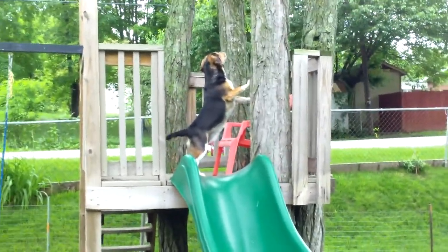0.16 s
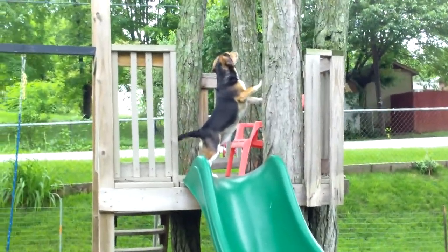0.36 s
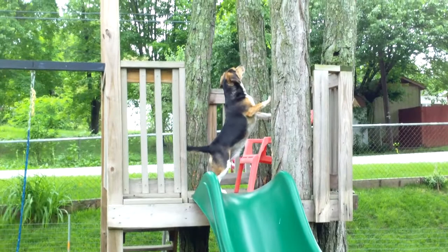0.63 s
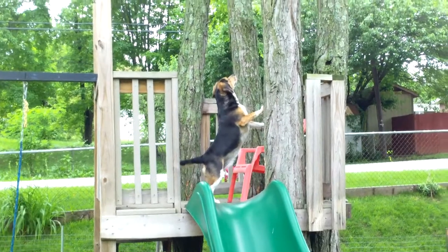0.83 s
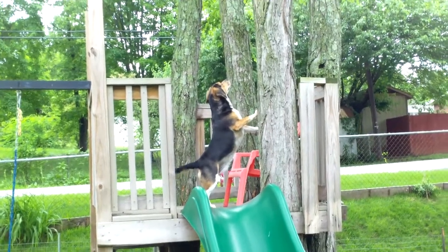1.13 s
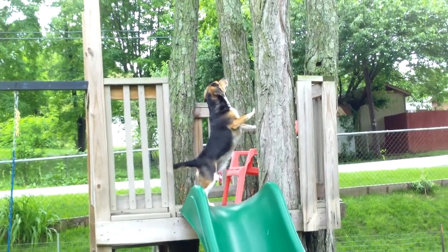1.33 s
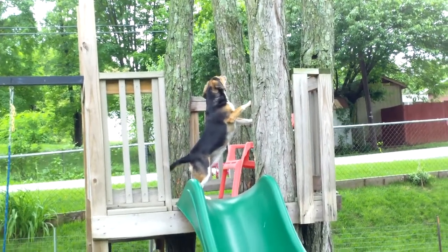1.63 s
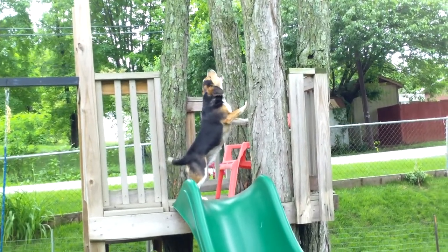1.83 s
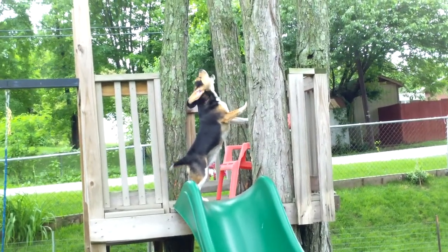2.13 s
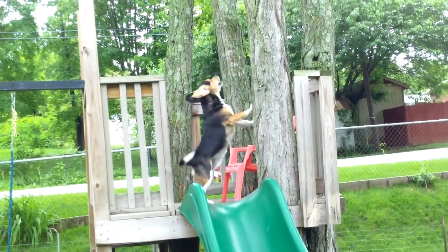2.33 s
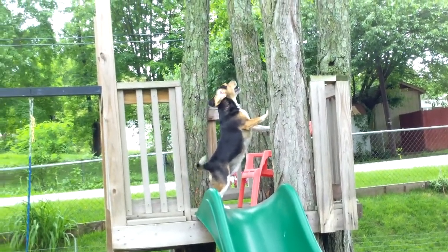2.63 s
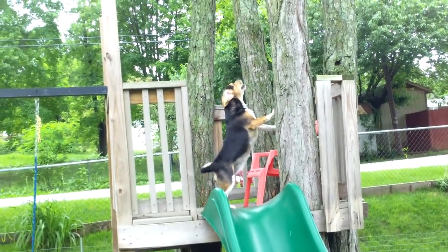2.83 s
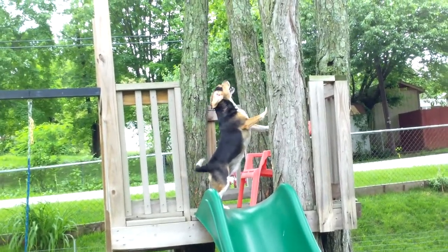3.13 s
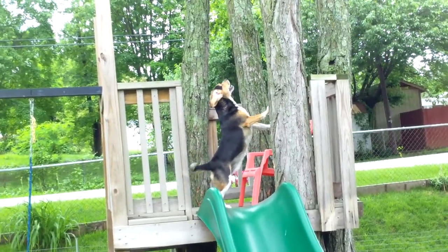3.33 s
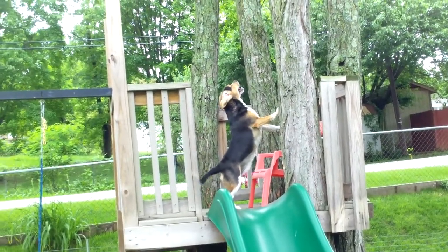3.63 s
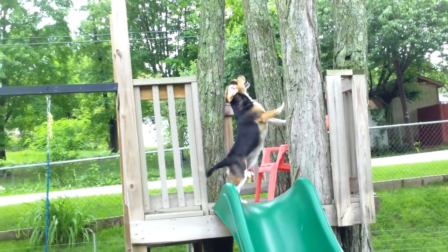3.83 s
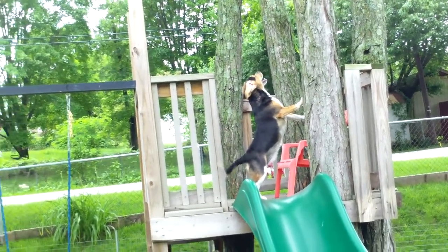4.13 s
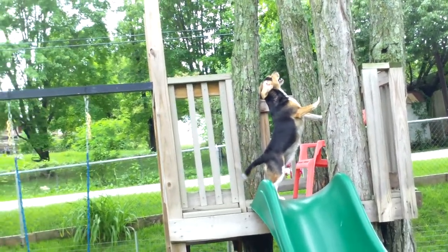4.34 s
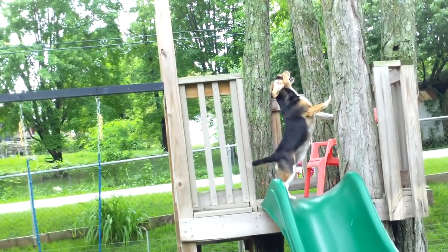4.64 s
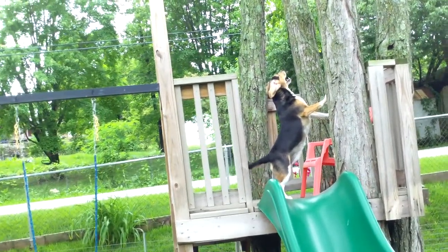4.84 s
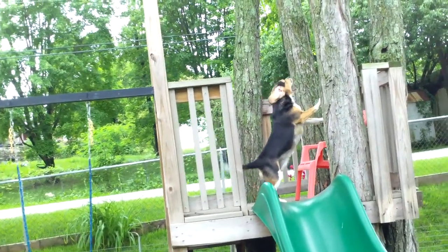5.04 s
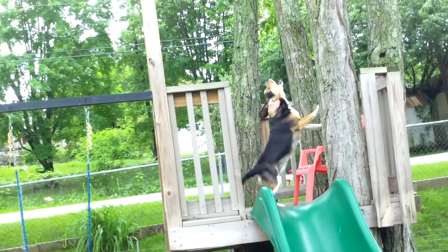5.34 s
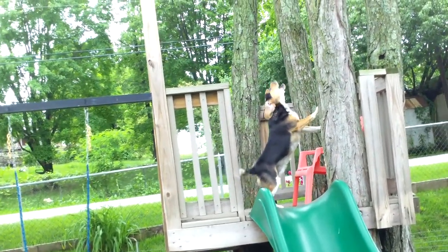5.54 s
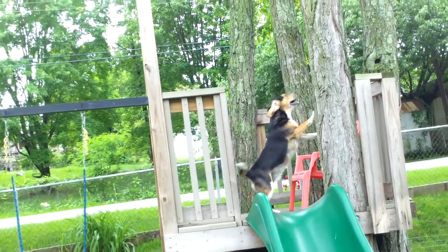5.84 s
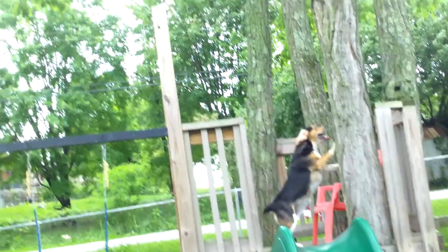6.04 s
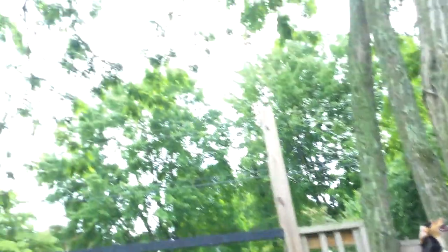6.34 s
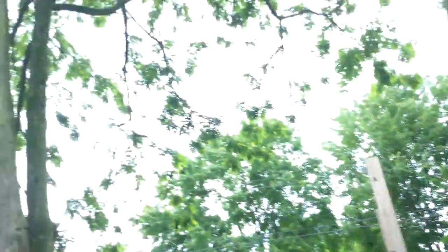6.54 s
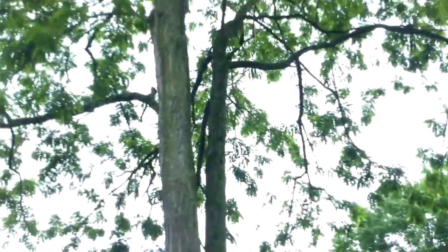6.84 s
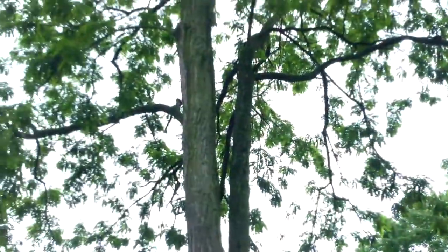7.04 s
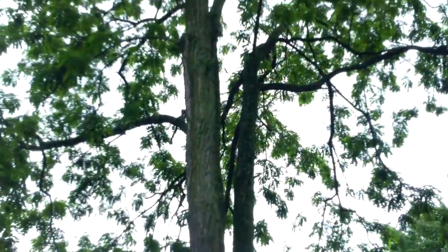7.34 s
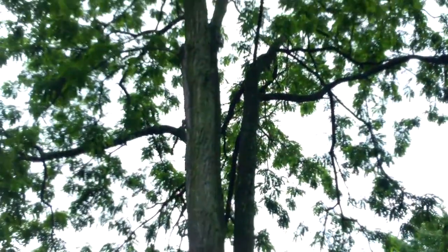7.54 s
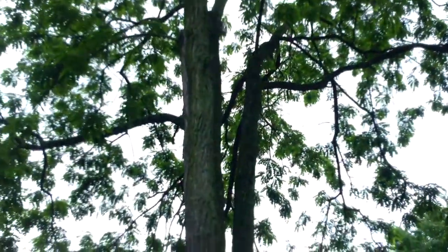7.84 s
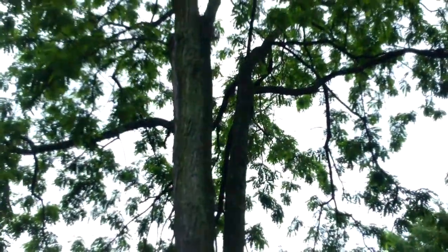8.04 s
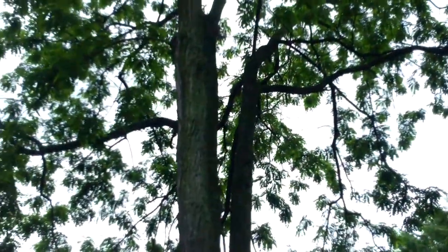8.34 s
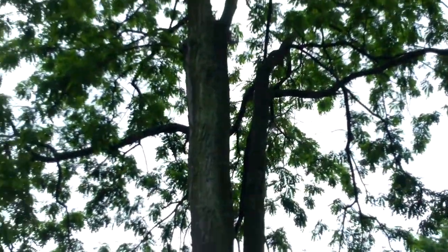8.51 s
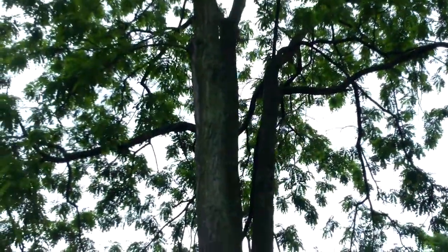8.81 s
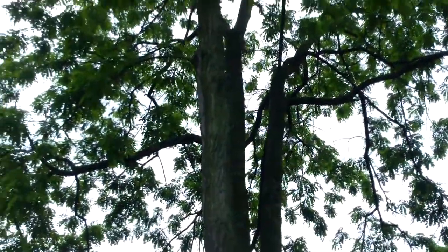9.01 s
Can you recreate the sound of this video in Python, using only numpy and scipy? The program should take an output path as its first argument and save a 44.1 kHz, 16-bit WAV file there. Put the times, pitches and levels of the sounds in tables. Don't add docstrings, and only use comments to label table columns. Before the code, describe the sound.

Outdoors, a dog bays loudly three times with a clipped bark between, echoing off houses over soft breeze and scattered birdsong.

```python
import sys
import numpy as np
from scipy import signal
from scipy.fft import rfft, irfft, next_fast_len
from scipy.io import wavfile
from scipy.ndimage import uniform_filter1d, minimum_filter1d

SR = 44100
rng = np.random.default_rng(int(sys.argv[2]) if len(sys.argv) > 2 else 0)


def put_to_file(sound):
    columns = np.atleast_2d(sound).T
    safe = np.clip(columns, -1, 1)
    whole_steps = np.round(safe * 32767)
    wavfile.write(sys.argv[1], SR, whole_steps.astype(np.int16))


def volts_from_decibels(level):
    exponent = np.asarray(level, float) / 20
    return 10 ** exponent


N = 404397
T = np.arange(N) / SR


def rms_one(x):
    return x / np.sqrt(np.mean(x ** 2) + 1e-20)


def evened(x, span_s):
    return x / np.sqrt(uniform_filter1d(x ** 2, int(span_s * SR)) + 1e-12)


def drift(rate_hz):
    r = np.exp(-2 * np.pi * rate_hz / SR)
    noise = rng.standard_normal(N + SR)
    return rms_one(signal.lfilter([1], [1, -2 * r, r * r], noise)[SR:])


def filtered(x, order, edges_hz, kind):
    return signal.sosfilt(signal.butter(order, edges_hz, kind, fs=SR, output="sos"), x)


def shaped(x, gain_at):
    size = next_fast_len(len(x))
    hz = np.arange(size // 2 + 1) * SR / size
    return irfft(rfft(x, size) * gain_at(hz), size)[:len(x)]


def resonance_gain(modes, hz):
    return np.sqrt(sum(volts_from_decibels(2 * db) / (1 + (2 * (hz - f) / w) ** 2) ** 2 for f, w, db in modes))


def played(notes, edge_s):
    s, *columns = np.transpose(np.concatenate(notes))
    gate = sum(np.clip(np.minimum(T - n[0][0], n[-1][0] - T) / edge_s + .5, 0, 1) for n in notes)
    curves = [uniform_filter1d(np.interp(T, s, c), size=300) for c in columns]
    return curves, np.minimum(gate, 1)


# pitch_hz, density_db_per_hz
YARD_SPECTRUM = [(12, -25.5), (20, 5.5), (126, -8), (246, -14), (373, -15.5), (493, -18.5), (616, -18.5),
                 (885, -21), (1080, -20.5), (1930, -23.5), (3280, -24), (6960, -34.5), (8690, -31),
                 (15600, -38)]
# time_s, level_db
BREEZE = [(0, -50.5), (1.5, -50), (3.0, -47), (4.5, -47), (6.0, -46), (7.0, -47), (8.1, -44.5), (8.5, -43),
          (8.85, -47), (9.17, -38)]


def yard_noise():
    points_hz, points_db = np.transpose(YARD_SPECTRUM)
    hum = shaped(rng.standard_normal(N),
                 lambda hz: volts_from_decibels(np.interp(np.log(hz + 1), np.log(points_hz), points_db)))
    breeze_db = np.interp(T, *np.transpose(BREEZE)) + .6 * drift(2)
    insect_modes = [(8580, 220, 0)]   # pitch_hz, width_hz, level_db
    insect = shaped(rng.standard_normal(N), lambda hz: resonance_gain(insect_modes, hz))
    air = rms_one(hum) * volts_from_decibels(breeze_db) + volts_from_decibels(-67 + 1.2 * drift(2)) * rms_one(insect)
    gust_s, leaves_hz, lull_share = .41, 5000, .4
    treble = shaped(air, lambda hz: 1 / (1 + (leaves_hz / (hz + 1)) ** 8))
    return air - lull_share * (T < gust_s) * treble


# start_s, length_s, first_hz, held_hz, level_db
SONG = [(0, 0.053, 2520, 2480, -70), (0.809, 0.059, 8200, 6630, -63.5), (0.848, 0.084, 6800, 7400, -62),
        (0.853, 0.36, 3200, 3420, -79), (4.264, 0.087, 3580, 2580, -63.5),
        (4.345, 0.065, 3120, 2685, -55.5), (4.436, 0.1, 2640, 2345, -62), (4.734, 0.052, 3210, 2790, -55),
        (4.915, 0.12, 2580, 2470, -60), (5.803, 0.13, 2470, 2350, -63), (6.017, 0.12, 2900, 2530, -49),
        (6.17, 0.065, 3220, 2250, -56), (6.381, 0.088, 2487, 2544, -58), (7.157, 0.2, 2760, 2503, -56),
        (7.956, 0.22, 5880, 5880, -66), (8.427, 0.11, 3440, 3330, -65.5), (8.5, 0.075, 2420, 2525, -66),
        (8.585, 0.04, 2300, 2860, -65), (8.992, 0.17, 2750, 2990, -63),
        (4.243, 0.023, 3250, 3900, -61.5), (4.325, .03, 2550, 3150, -56), (4.72, .04, 3250, 4000, -65),
          (5.945, .035, 2300, 2350, -57.5), (8.05, 0.081, 6400, 5620, -69), (8.1, 0.035, 2600, 2450, -62),
          (4.26, 0.095, 3200, 3620, -72), (4.77, 0.15, 2750, 2230, -59), (4.43, 0.051, 2600, 2400, -58.5),
          (7.02, 0.07, 3450, 3300, -69), (6, 0.028, 3200, 3500, -60)]


def song(flutter_db):
    slide_s, fade_db = .05, -3
    out = np.zeros(N + SR)
    for start_s, length_s, first_hz, held_hz, level_db in SONG:
        part = np.linspace(0, 1, int(length_s * SR))
        left = np.clip(1 - part * length_s / slide_s, 0, 1) ** 2
        pitch_hz = held_hz + (first_hz - held_hz) * left
        shape = volts_from_decibels(level_db + fade_db * (part - 2)) * np.sqrt(2 * np.sin(np.pi * part).clip(0))
        out[int(start_s * SR):][:len(part)] += shape * np.sin(2 * np.pi * np.cumsum(pitch_hz) / SR)
    return out[:N] * volts_from_decibels(flutter_db * drift(50))


# start_s, length_s, first_hz, last_hz, level_db
CHIPS = [(3.09, .022, 4900, 6000, -50), (.1, .13, 1100, 1240, -61), (5.8, .08, 2700, 3300, -62),
         (1.86, .075, 3230, 3170, -34), (0, 0.017, 7360, 7100, -60.5), (0.093, 0.059, 3930, 3560, -61),
         (0.266, 0.059, 2830, 3100, -62.5), (0.41, 0.034, 4970, 5120, -55.5),
         (0.492, 0.029, 7130, 7250, -64), (0.758, 0.037, 3275, 3250, -58), (1.094, 0.018, 4300, 6330, -45),
         (1.447, 0.02, 4200, 6230, -44.5), (1.082, 0.016, 6400, 4890, -52.5),
         (1.44, 0.012, 6200, 4500, -51), (1.107, .02, 5900, 5200, -55), (1.465, .03, 6000, 5940, -58),
         (1.468, 0.013, 5820, 5450, -52.5), (8.907, 0.022, 3530, 3800, -51), (5.72, 0.065, 2650, 3250, -53),
         (1.548, 0.025, 4140, 4524, -60), (1.572, .018, 4650, 4825, -57.5), (1.6, 0.016, 960, 880, -50.5),
         (2.671, .009, 5960, 5000, -55), (2.677, 0.02, 4400, 5870, -51), (2.697, 0.0098, 5800, 5100, -54),
         (2.71, .018, 5800, 5100, -58), (2.984, 0.095, 3700, 3750, -60.5),
         (4.729, 0.031, 5400, 4280, -54.5), (7.072, 0.036, 2250, 2350, -49.5),
         (7.185, 0.031, 4260, 4000, -43.5), (7.067, 0.13, 3450, 2840, -52), (9.044, .075, 3040, 1840, -52)]


def chips():
    out = np.zeros(N + SR)
    for start_s, length_s, first_hz, last_hz, level_db in CHIPS:
        n = int(length_s * SR)
        phase = 2 * np.pi * np.cumsum(np.linspace(first_hz, last_hz, n)) / SR
        out[int(start_s * SR):][:n] += volts_from_decibels(level_db) * 2 * np.hanning(n) * np.sin(phase)
    return out[:N] * volts_from_decibels(2.5 * np.tanh(drift(150)))


def grit_bursts(table, octaves):
    lead_s = .3
    out, t = np.zeros(N + 2 * SR), np.arange(SR) / SR - lead_s
    for peak_s, rise_s, fall_s, level_db, centre_hz in table:
        grit = rng.standard_normal(SR) * volts_from_decibels(rng.exponential(1, SR))
        edges_hz = np.clip(centre_hz * 2 ** (np.array([-.5, .5]) * octaves), 30, .45 * SR)
        shape = np.where(t < 0, np.exp(-(t / rise_s) ** 2), np.exp(-t / fall_s))
        out[int(peak_s * SR):][:SR] += volts_from_decibels(level_db) * shape * rms_one(filtered(grit, 3, edges_hz, "band"))
    return out[int(lead_s * SR):][:N]


# peak_s, rise_s, fall_s, level_db, centre_hz
WHINE = [(.02, .03, .05, -60, 1050), (.05, .04, .04, -66, 1520), (.16, .035, 0.042, -57, 1210),
         (.25, .03, .04, -66, 1280), (.32, .03, .06, -58, 1360), (.43, .03, .04, -59, 1410),
         (.52, 0.033, .05, -61, 1380)]


def whine():
    return grit_bursts(WHINE, octaves=.13)


# peak_s, rise_s, fall_s, level_db, centre_hz
RUSTLES = [(.3, 0.35, 0.07, -62, 3620), (3.564, .0055, 0.019, -45.5, 4500),
           (3.62, 0.032, 0.054, -37.5, 3270), (3.62, 0.044, 0.068, -46.5, 5330),
           (3.634, 0.039, 0.051, -47.5, 9620), (3.8, .03, 0.11, -52, 8640),
           (8.909, .0016, 0.01, -33.5, 4960), (9.11, 0.044, .06, -46, 5000),
           (3.09, 0.0038, 0.013, -46, 5200), (3.41, 0.016, 0.11, -53, 4400), (4.36, .06, 0.036, -50, 2900),
           (4.9, 0.13, 0.18, -55, 3410), (6.74, 0.11, 0.063, -55, 3650)]


def rustles():
    return grit_bursts(RUSTLES, octaves=.55)


# peak_s, rise_s, fall_s, level_db, centre_hz
RASPS = [(3.627, .004, .04, -44, 5600), (3.63, .02, .04, -43.5, 7800), (3.713, .002, 0.05, -43.5, 8000),
         (3.766, .002, 0.055, -41, 9000), (3.884, 0.002, 0.055, -47, 8100), (.411, .002, .012, -55, 5000),
         (6.085, .025, .015, -47, 1650), (5.4, .03, .03, -51, 3950), (8.25, .04, .04, -58, 3850),
         (8.37, .03, .04, -56, 2350)]


def rasps():
    return grit_bursts(RASPS, octaves=.24)


# peak_s, rise_s, fall_s, level_db, centre_hz
CLAWS = [(.681, 0.031, 0.17, -52.5, 3800), (1.257, 0.0008, 0.0017, -38, 3500),
         (1.267, 0.0011, .003, -41.5, 3010), (6.08, 0.025, 0.017, -43.5, 4770),
         (6.352, 0.047, 0.033, -49.5, 3500), (6.656, 0.018, 0.0099, -53.5, 4000),
         (7.239, 0.019, 0.028, -46.5, 2345)]


def claws():
    return grit_bursts(CLAWS, octaves=1.52)


# peak_s, rise_s, fall_s,
# level_db, centre_hz
KNOCKS = [(7.414, 0.017, 0.019, -11, 668), (5.29, 0.017, .008, -9, 850), (7.965, .02, .02, -39, 1060),
          (3.179, 0.004, 0.012, -8, 850), (4.05, 0.074, 0.43, -56, 1500), (4.43, 0.0082, 0.074, -38.5, 243),
          (6.349, 0.071, 0.1, -48.5, 1570), (8.908, 0.00026, 0.024, -32.5, 1165),
          (8.956, 0.00018, 0.0065, -30.5, 1090), (8.99, .018, 0.2, -44.5, 1180),
          (9.119, 0.037, 0.16, -37, 1180)]
THUMPS = [
    (3.2, 0.019, 0.028, -37, 248.5),
    (8.91, .003, 0.041, -41, 110),
]


def knocks():
    return grit_bursts(KNOCKS, octaves=.5) + grit_bursts(THUMPS, octaves=1)


# start_s, length_s, attack_s, first_hz, last_hz, level_db, overtones_db
YELPS = [
    (1.804, .047, 0.011, 1083, 1060, -7.5, 2.5),
    (1.851, 0.081, 0.0071, 1160, 1179, -21, -19.5),
    (5.217, 0.029, 0.012, 1095, 1011, -6, 2),
    (5.2445, 0.012, 0.0027, 1074, 1011, -3, -5.5),
    (5.255, 0.051, 0.0035, 1151, 1167, -13.5, -13.5),
]
YELP_OVERTONES_DB = [2.5, -6, -37.5, -26, -34.5, -23, -23.5, -17.5, -30]


def yelps():
    release_s, edge_db, upper_db, upper_fade_db = .0025, -21.5, -.5, -7
    notes = []
    for start_s, length_s, attack_s, first_hz, last_hz, level_db, over_db in YELPS:
        note = []
        for at_s, swell_db in ((0, edge_db), (attack_s, 0), (length_s - release_s, 0), (length_s, edge_db)):
            part, db = at_s / length_s, level_db + swell_db
            note.append((start_s + at_s, first_hz + (last_hz - first_hz) * part, db,
                         db + over_db + upper_db + upper_fade_db * part))
        notes.append(note)
    (pitch_hz, low_db, high_db), gate = played(notes, .003)
    phase = 2 * np.pi * np.cumsum(pitch_hz * (1 + .007 * drift(50))) / SR
    low = volts_from_decibels(low_db + 2 * drift(48)) * np.sin(phase)
    stack = sum(volts_from_decibels(db) * np.cos(n * phase + 2.44) for n, db in enumerate(YELP_OVERTONES_DB, 2))
    return gate * np.sqrt(2) * (low + volts_from_decibels(high_db - 10.5 + 2.9 * drift(130)) * stack)


# start_s, first_roughness_0_1, hoarse_s, clear_s, crack_s
PHASES = [
    (1.84, .85, 1.88, 2.203, 2.325),
    (3.09, .95, 3.09, 3.12, 3.162),
    (5.25, .85, 5.3, 5.675, 5.712),
    (7.35, .06, 7.392, 7.86, 7.89),
]


def roughness():
    rough = np.zeros(N)
    for start_s, first, hoarse_s, clear_s, crack_s in PHASES:
        # from_s, span_s, goal
        turns = [(start_s, .001, first), (hoarse_s, .018, .95), (clear_s - .025, .025, .03),
                 (crack_s, .025, .7)]
        for from_s, span_s, goal in turns:
            rough = rough + (goal - rough) * np.clip((T - from_s) / span_s, 0, 1)
    return rough


# start_s, period_cycles, firmness, even_part
PULSE_PATTERN = [(0, 4, 2.3, 0), (2.11, 4, 1.2, 0), (5, 4, 3, 0), (5.5, 3, 2.2, 0), (7, 5, 1.4, 0),
                 (7.57, 3, 1.8, 0), (7.66, 3, 2, .6)]


def folds(pitch_hz, rough):
    cycles = np.cumsum(pitch_hz * (1 + .011 * rough * drift(60))) / SR
    count = cycles.astype(int)
    chance = np.clip(rng.standard_normal(count[-1] + 1), -1.6, 1.6)[count] * .75
    starts_s, periods, firmness, even = np.transpose(PULSE_PATTERN)
    section = np.searchsorted(starts_s, T, side="right") - 1
    period = periods[section]
    slips = np.cumsum(rng.random(N) < 12 / SR)
    accent = ((count + slips) % period == 0) - 1 / period
    strength = chance + even[section] + firmness[section] * accent
    pulses = np.diff(count, prepend=0) * strength
    puff = (.5 + .5 * np.cos(2 * np.pi * cycles)) ** 2
    air = rng.standard_normal(N) * puff * volts_from_decibels(1.5 * strength)
    return 2 * np.pi * cycles, pulses, air


def tract(modes, hoarse_modes, slide, pitch_hz, phase, rough, flow, widen, tilt_db, on):
    wide_modes = [(f, widen * w, db) for f, w, db in modes]
    heights = [volts_from_decibels(tilt_db * n) * resonance_gain(wide_modes, n * pitch_hz[on]) for n in range(2, 22)]
    clean, moving = np.zeros(N), np.zeros(N)
    clean[on] = sum(h * np.cos(n * phase[on] + 1.3 * (n - 2)) for n, h in enumerate(heights, 2))
    clean[on] /= np.sqrt(np.sum(np.square(heights), axis=0) / 2)
    for step in (-1, 0, 1):
        share = np.clip(1 - np.abs(slide[on] - step), 0, 1)
        moved = shaped(flow[on], lambda hz: resonance_gain(hoarse_modes, hz / (1 + .05 * step)))
        moving[on] += share * moved
    return np.sqrt(1 - rough) * clean + np.sqrt(rough) * evened(moving, .034)


# time_s, level_db, chest_over_throat_db, mouth_0_2
BAYS = [
    [(1.845, -10.5, -20, 1.2), (1.86, -16.5, -9.5, 0.85), (1.91, -12, 8, 1.16), (1.95, -14, 3.5, 0.15),
     (2.09, -14, 6.5, .05), (2.2, -20, 9, .05), (2.225, -21, 6, .05), (2.31, -17.5, -14, 0.4),
     (2.35, -39, -16.5, .05)],
    [(5.254, -13.5, -13.5, 1.5), (5.296, -16.5, 1, 1.26), (5.315, -12.5, 5, 0.33), (5.4, -13, 5.5, 0.041),
     (5.53, -17, 5.5, 0.055), (5.64, -21.5, 7, 0.057), (5.675, -19.5, 2, .05), (5.715, -19.5, -16, .05),
     (5.73, -41, -11, .05)],
    [(7.355, -27.5, 8, .05), (7.37, -21, -14.5, .05), (7.411, -10.5, -4, 0.34), (7.45, -11.5, 0, 0.055),
     (7.5, -13.5, 0.7, 0.056), (7.63, -14.5, 1, 0.035), (7.8, -18.5, 2, 0.043), (7.868, -20, -3, 0.06),
     (7.888, -23, -20, .05)],
]
BARK = [
    (3.101, -18, -20, 1.1),
    (3.107, -15.5, -7.5, 1.4),
    (3.127, -8.5, -6, 1.4),
    (3.155, -10, -4, 1.4),
    (3.181, -21.5, -15.5, 2.1),
    (3.211, -38.5, -12, 2.41),
]
# time_s, pitch_hz
PITCH = [
    [(1.843, 565), (1.91, 637), (1.95, 650), (2.02, 638), (2.23, 571), (2.3, 531), (2.35, 497)],
    [(3.098, 515), (3.145, 564), (3.166, 560), (3.18, 455), (3.21, 390)],
    [(5.25, 555), (5.272, 588), (5.297, 597), (5.306, 628), (5.35, 636), (5.43, 628), (5.58, 586),
     (5.67, 567), (5.73, 500)],
    [(7.355, 347), (7.378, 370), (7.392, 430), (7.406, 510), (7.428, 560), (7.47, 625), (7.51, 630),
     (7.6, 599), (7.79, 584), (7.84, 566), (7.895, 485)],
]
# centre_hz, width_hz, level_db
THROAT = [(780, 195, 6), (930, 44, 11), (1060, 31, 9.5), (1160, 59, 11), (1350, 67, 9), (1582, 47, -2.5)]
THROAT_HOARSE = [(789, 161, 8), (972, 100, 14.5), (1108, 200, 8.5), (1210, 120, 2.5), (1390, 100, 9),
                 (1590, 200, -13)]
MOUTH_OPEN = [(1780, 490, 7), (2250, 1600, -5), (2750, 570, -3), (3250, 290, -2), (3980, 910, -30.5),
              (6860, 1100, -23), (8340, 4600, -19)]
MOUTH_NARROW = [(1920, 83, 3), (2350, 230, -8), (2630, 225, 0), (3620, 290, -11), (4400, 480, -8.5),
                (4850, 1400, -19), (7250, 380, -10), (8540, 1300, -22), (10030, 900, -24),
                (11600, 1100, -27)]


def bays():
    (level_db, chest_db, mouth), gate = played([BAYS[0], BARK, *BAYS[1:]], .006)
    opening, on = np.clip(mouth, 0, 1), gate > 0
    throat_db = level_db - 10 * np.log10(1 + volts_from_decibels(2 * chest_db))
    upper_db = level_db - 31.5 + 14.5 * mouth
    pitch_hz = np.interp(T, *np.transpose(np.concatenate(PITCH)))
    rough = roughness()
    phase, pulses, air = folds(pitch_hz, rough)
    low = np.sqrt(2) * np.sin(phase) * volts_from_decibels(throat_db + chest_db + 2.06 * rough * drift(32))
    rest_hz = 609
    slide = np.clip(3.3 * np.log2(pitch_hz / rest_hz) + .6 * opening + .49 * drift(34), -1, 1)
    throat = volts_from_decibels(throat_db) * tract(THROAT, THROAT_HOARSE, slide, pitch_hz, phase, rough,
                                    rms_one(pulses) + .6 * air, widen=.73, tilt_db=.77, on=on)
    mouth_flow = .45 * rms_one(pulses) + air
    wide, narrow = (tract(modes, modes, .55 * slide, pitch_hz, phase, .04 + .96 * rough, mouth_flow,
                          widen=.7, tilt_db=-2.6, on=on) for modes in (MOUTH_OPEN, MOUTH_NARROW))
    upper = volts_from_decibels(upper_db + 2.5 * drift(32)) * (opening * wide + (1 - opening) * narrow)
    chest = shaped(pulses, lambda hz: resonance_gain([(210.4, 210, 0)], hz))
    rumble = evened(chest + 1e-9, .05) * gate * rough * volts_from_decibels(level_db - 45.5)
    return rumble + filtered(-gate * (low + throat + upper), 4, 400, "high")


def whistle(notes, octave_db, flutter_db):
    (pitch_hz, level_db), gate = played(notes, .004)
    phase = 2 * np.pi * np.cumsum(pitch_hz) / SR
    tone = np.sin(phase) + volts_from_decibels(octave_db) * np.sin(2 * phase)
    return gate * np.sqrt(2) * volts_from_decibels(level_db + flutter_db * drift(75)) * tone


# time_s, pitch_hz, level_db
NEAR_BIRD = [
    [(3.775, 9550, -38), (3.81, 9330, -37), (3.845, 9190, -32), (3.874, 9170, -33)],
    [(3.895, 6090, -48), (3.928, 6156, -27), (3.99, 6360, -38), (4.048, 6550, -28), (4.085, 6740, -35),
     (4.142, 6840, -30), (4.19, 6850, -48)],
]


def near_bird():
    return whistle(NEAR_BIRD, octave_db=-19.5, flutter_db=3)


# start_s, level_db
WARBLES = [
    (6.668, -40.5),
    (7.97, -45.5),
]
# offset_s, pitch_hz, level_db
WARBLE_SHAPE = [(0, 4200, -9), (.011, 4650, -4), (.021, 3550, -4), (.034, 3000, -9), (.044, 3250, -1),
                (.058, 3850, -4), (.066, 3200, 0), (.08, 2700, -6), (.1, 3100, -13), (.12, 3600, -4),
                (.14, 2700, -9)]


def warbles():
    notes = [np.add(WARBLE_SHAPE, (start_s, 0, level_db)) for start_s, level_db in WARBLES]
    return whistle(notes, octave_db=-50, flutter_db=1.5)


# delay_s, level_db
ECHOES = [(0.063, -19), (0.103, -24.5), (.17, -45.5), (0.309, -41)]


def echoes(x, tail_db, t60_s, dull_hz, slap_db):
    t = np.arange(2 * SR) / SR
    shape = volts_from_decibels(tail_db - 60 * t / t60_s) + volts_from_decibels(tail_db - 16.5 - 17 * t / t60_s)
    shape = shape * np.clip(t / .0027, 0, 1)
    for delay_s, level_db in ECHOES:
        shape = shape + volts_from_decibels(level_db + slap_db) * np.exp(-((t - delay_s) / .0013) ** 2)
    wet = signal.fftconvolve(x, shape * rng.standard_normal(len(t)))[:N]
    wet = wet * volts_from_decibels(1.5 * drift(40))
    return filtered(wet, 2, [720, dull_hz], "band")


def gain_control(loud, knee_db, slope, attack_s, release_db_per_s):
    level_db = 10 * np.log10(np.abs(uniform_filter1d(loud ** 2, size=600)) + 1e-12)
    climb_db = release_db_per_s * T
    held_db = np.maximum.accumulate(level_db + climb_db) - climb_db
    r = np.exp(-1 / (attack_s * SR))
    return volts_from_decibels(-slope * signal.lfilter([1 - r], [1, -r], np.maximum(held_db - knee_db, 0)))


def scene():
    air, far, short = yard_noise(), song(flutter_db=2.2) + warbles(), chips()
    small = whine() + rustles() + rasps() + claws() + knocks()
    dog = filtered(yelps(), 3, 500, "high") + bays()
    near = near_bird()
    duck = gain_control(dog, knee_db=-27.5, slope=.73, attack_s=.21, release_db_per_s=34)
    voice = dog / duck
    yard = air + near + far + short + small
    yard += echoes(voice, tail_db=-48.5, t60_s=.66, dull_hz=3500, slap_db=-22.5)
    yard += echoes(np.diff(voice, prepend=0), tail_db=-31, t60_s=.25, dull_hz=10500, slap_db=-30)
    yard += echoes(near + .5 * small, tail_db=-35, t60_s=.33, dull_hz=12000, slap_db=-16.5)
    yard += echoes(far + .48 * short, tail_db=-38, t60_s=.55, dull_hz=9000, slap_db=-36.5)
    return (dog + duck * yard)[None]


def roll_off(x):
    return signal.sosfilt(signal.butter(12, 15760, fs=SR, output="sos"), x)


def record(dry):
    top, margin, hardness, cutoff_hz = .71, 1.05, 24, 15750
    gain = np.minimum(1, margin * top / (np.abs(dry) + 1e-9))
    held = dry * uniform_filter1d(minimum_filter1d(gain, size=181), size=181)
    flat = held / (1 + np.abs(held / top) ** hardness) ** (1 / hardness)
    cut = signal.sosfilt(signal.ellip(10, .5, 70, cutoff_hz, fs=SR, output="sos"), flat)
    return roll_off(cut)


dry = scene()
out = record(dry)
put_to_file(out)
```